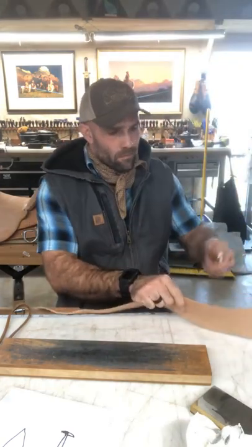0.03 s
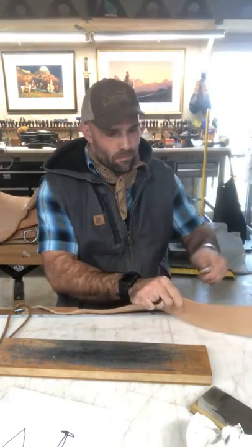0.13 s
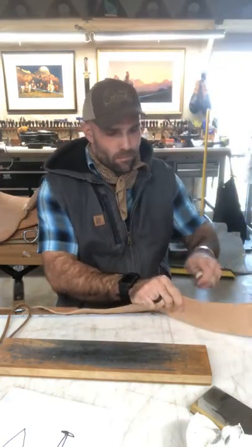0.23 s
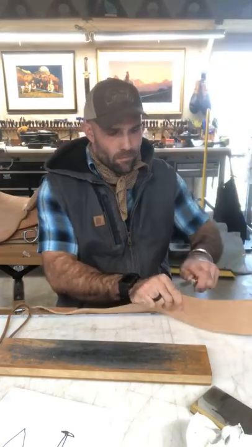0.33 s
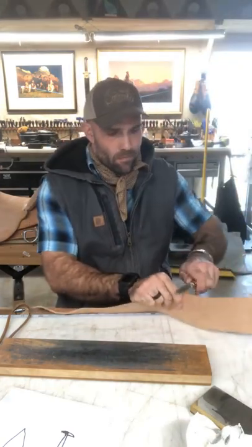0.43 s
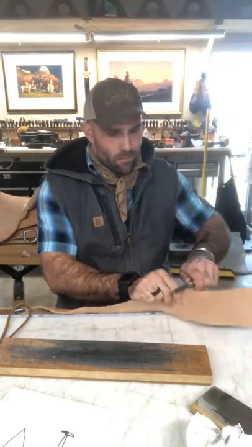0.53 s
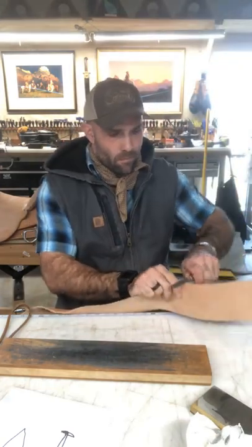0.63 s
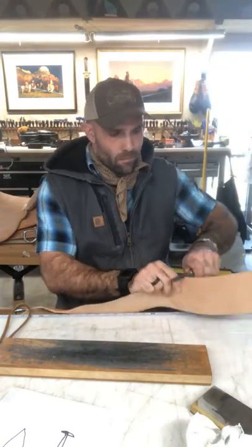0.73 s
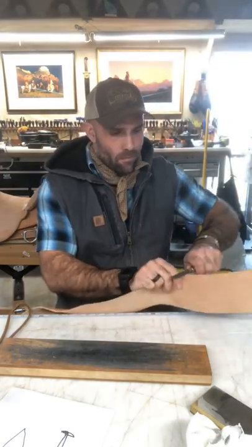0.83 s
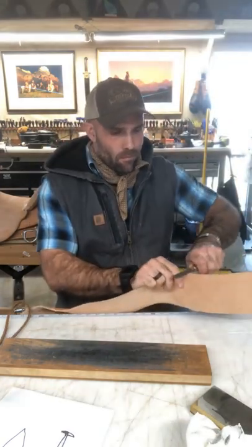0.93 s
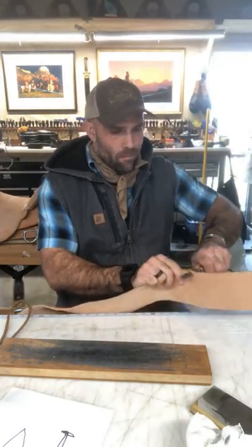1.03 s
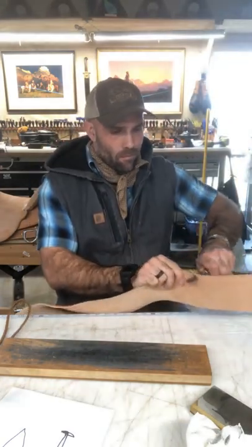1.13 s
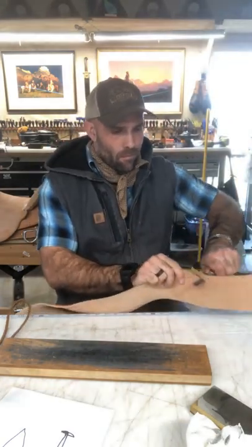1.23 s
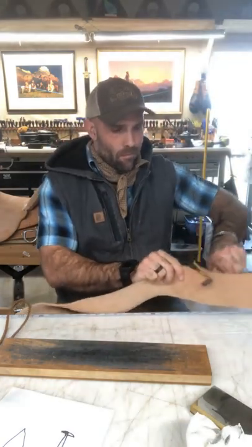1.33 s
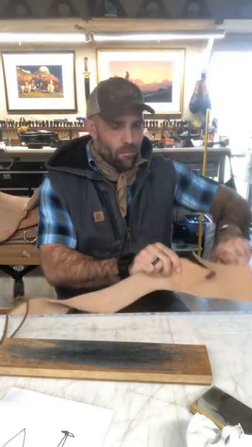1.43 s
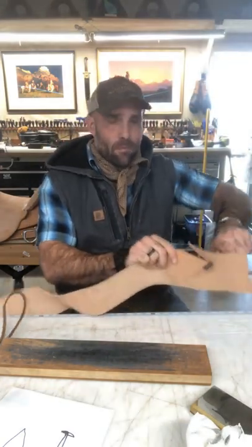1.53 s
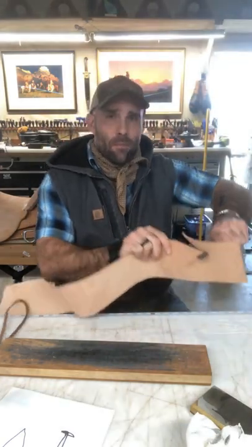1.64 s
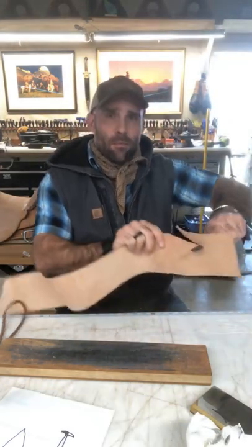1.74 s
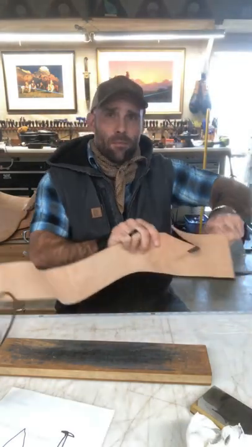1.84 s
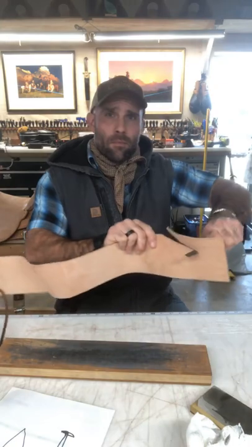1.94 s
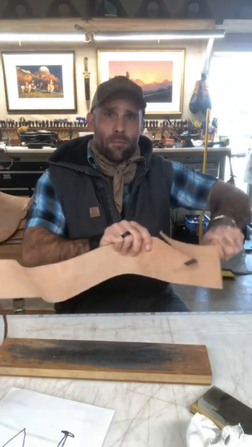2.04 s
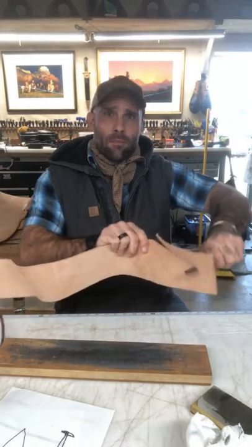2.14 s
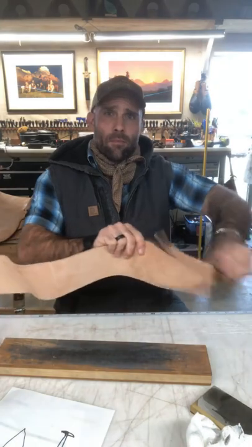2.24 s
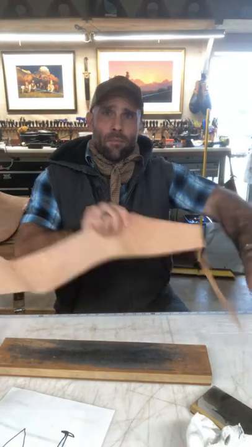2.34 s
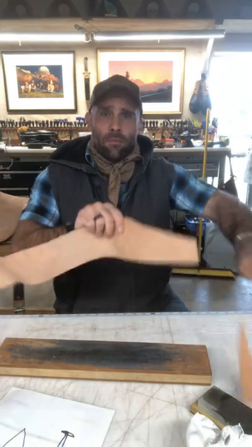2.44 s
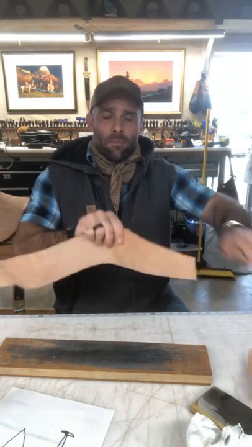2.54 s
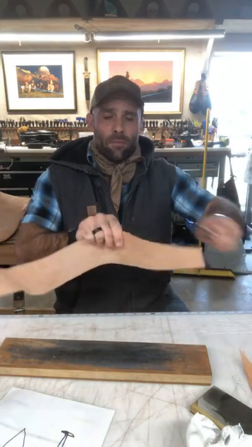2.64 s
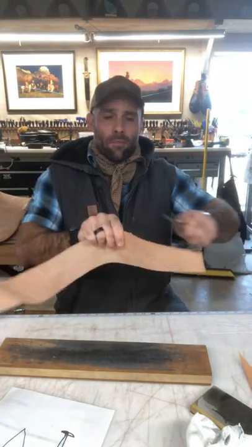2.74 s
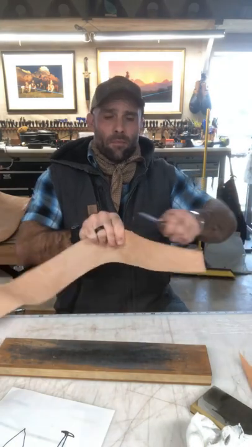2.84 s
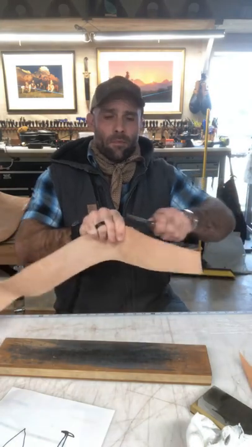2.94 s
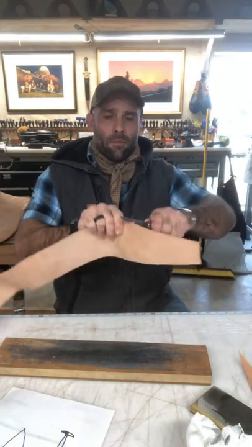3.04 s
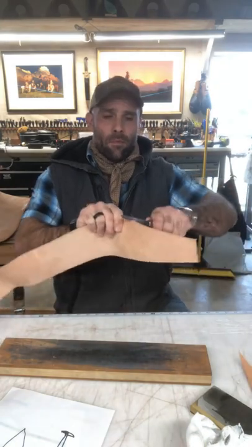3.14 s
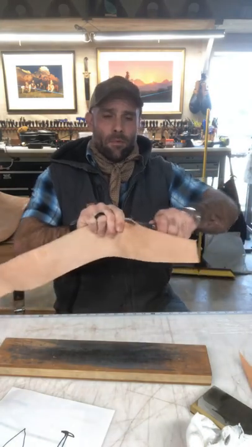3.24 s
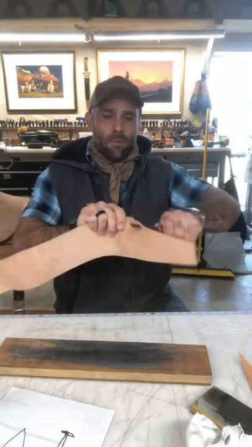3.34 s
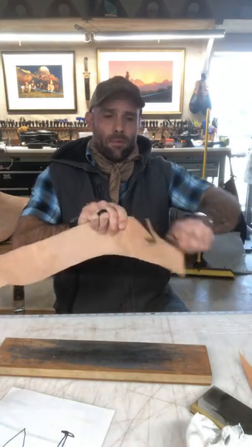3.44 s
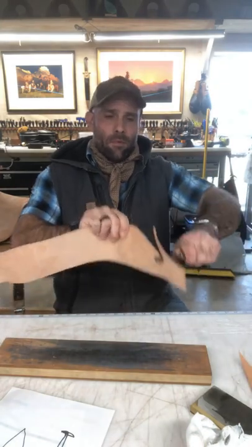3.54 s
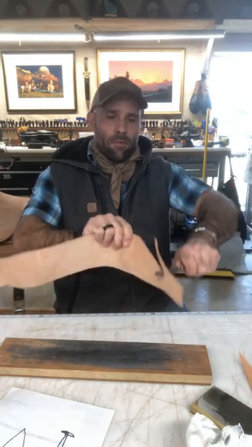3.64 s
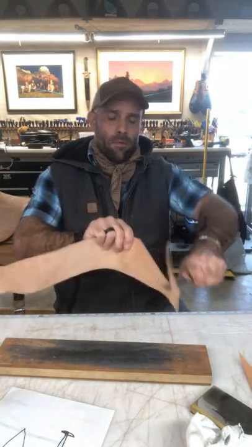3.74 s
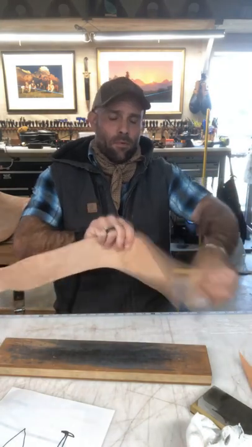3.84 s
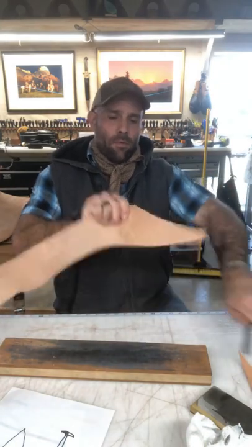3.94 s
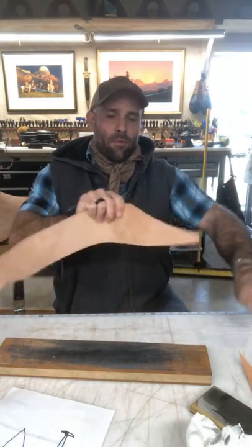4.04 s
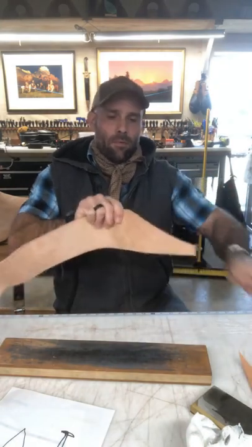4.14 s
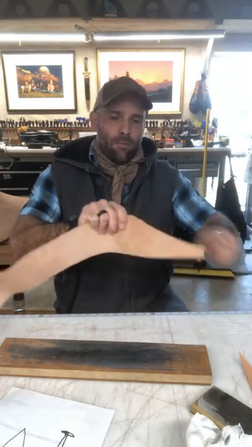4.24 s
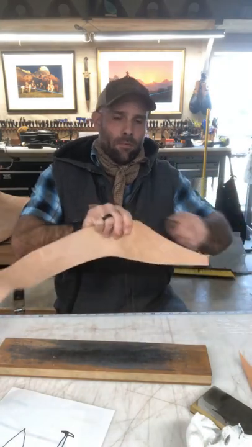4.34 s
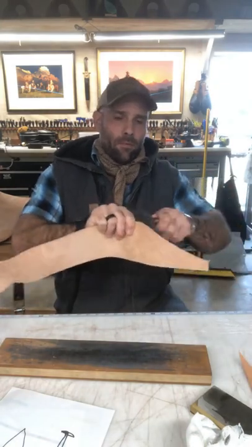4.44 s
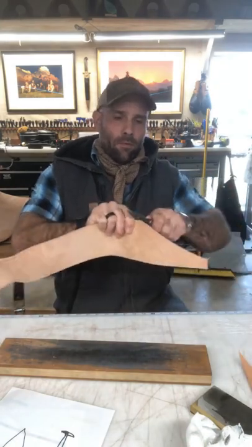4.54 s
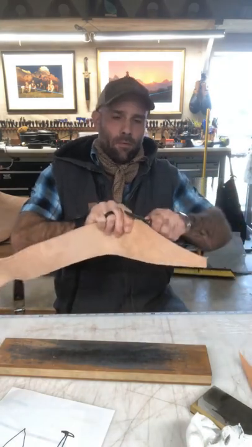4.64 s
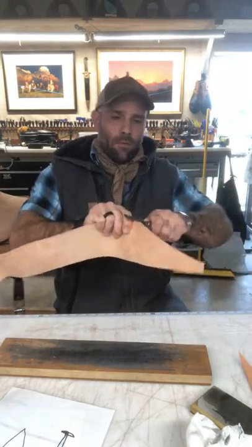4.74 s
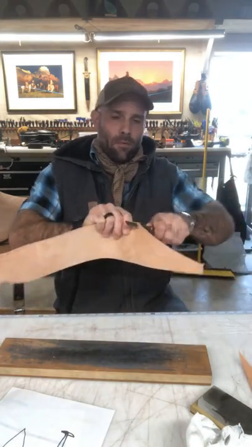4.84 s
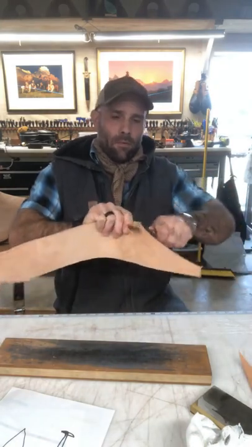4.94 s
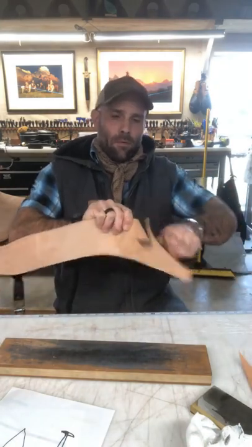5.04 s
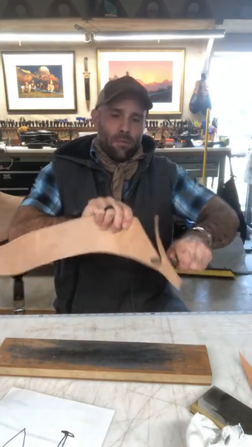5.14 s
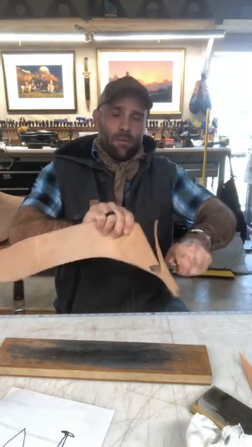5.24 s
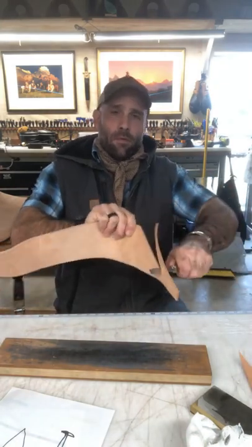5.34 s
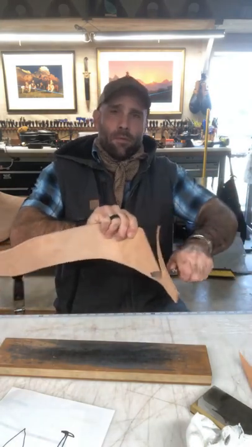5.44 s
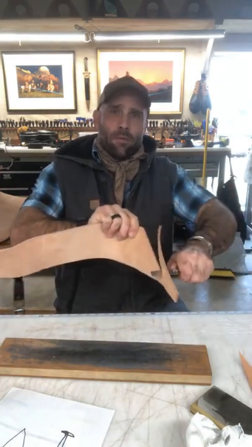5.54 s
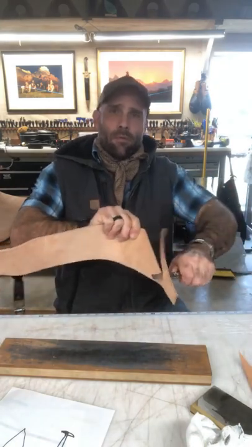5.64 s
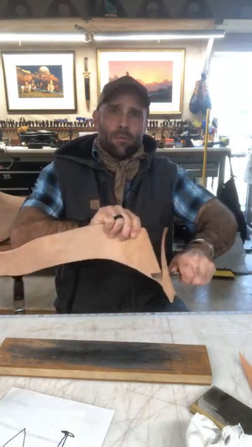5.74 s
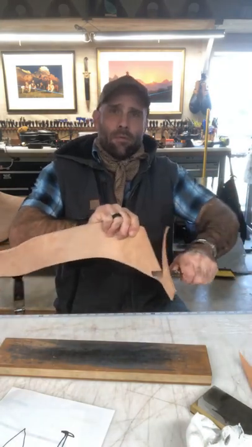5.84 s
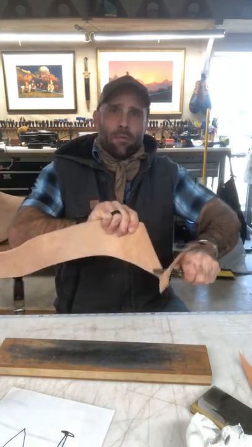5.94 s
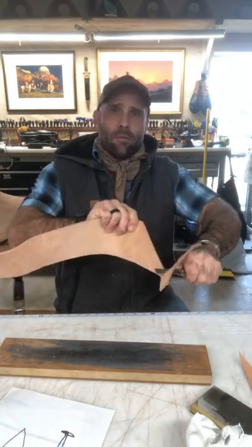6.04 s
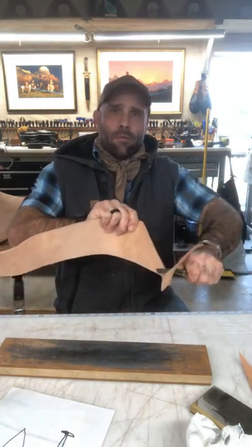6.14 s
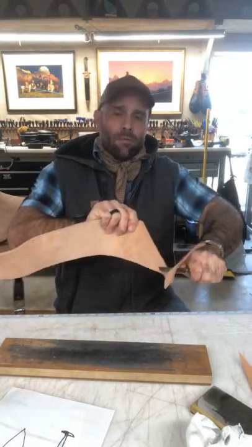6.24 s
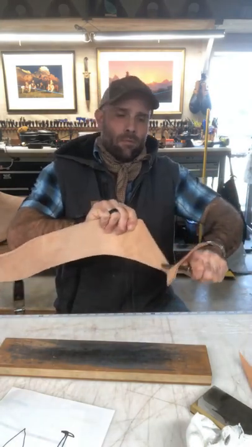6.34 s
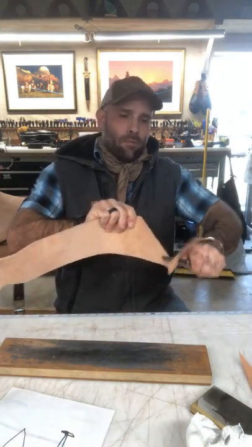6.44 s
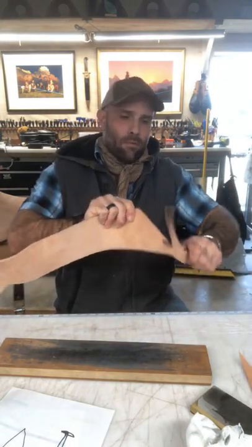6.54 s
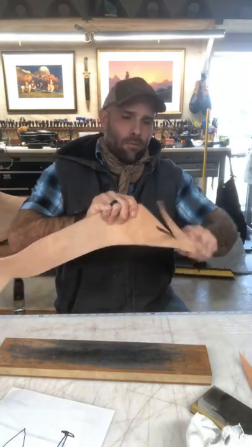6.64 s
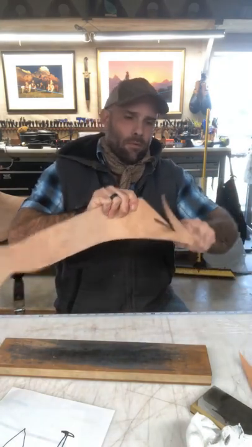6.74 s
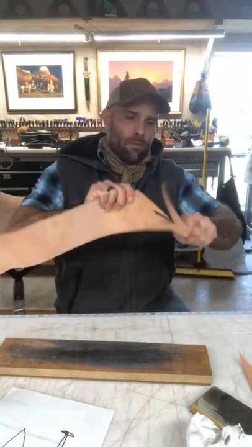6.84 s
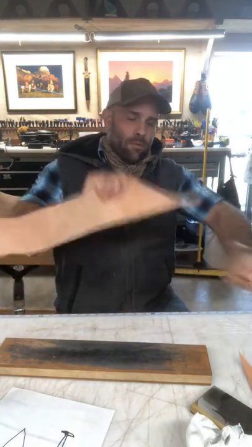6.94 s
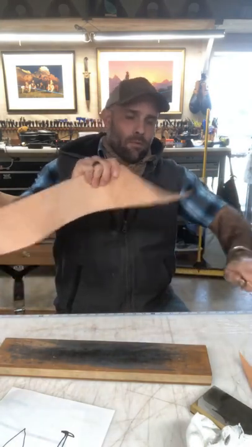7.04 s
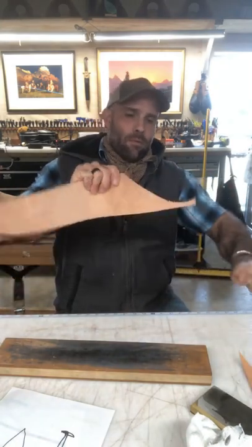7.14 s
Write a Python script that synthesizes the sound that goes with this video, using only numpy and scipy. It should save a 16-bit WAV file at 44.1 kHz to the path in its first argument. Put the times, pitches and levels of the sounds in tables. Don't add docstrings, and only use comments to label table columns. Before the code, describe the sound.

Low hum and faint air in a workshop, heard by a nearby phone with slightly dulled top. A blade drags through stiff leather with a dry scrape and a moving mid-pitched resonance: first a long stroke, then two brief strong ones with muffled thuds and little ticks between. A cluster of sharp, irregular stick-slip snaps follows, then near quiet, a loud short rip and a final dull drop.

```python
import sys
import numpy as np
from scipy import signal
from scipy.fft import rfft, irfft, next_fast_len
from scipy.io import wavfile
from scipy.ndimage import uniform_filter1d, map_coordinates

SR = 44100
rng = np.random.default_rng(int(sys.argv[2]) if len(sys.argv) > 2 else 0)


def unload_audio(sound):
    columns = np.transpose(np.atleast_2d(sound))
    steps = np.round(np.clip(columns, -1, 1) * 32767)
    wavfile.write(sys.argv[1], SR, steps.astype(np.int16))


def level_to_linear(level):
    exponent = np.asarray(level, float) / 20
    return 10 ** exponent


N = 317501

# (frequency [Hz], width [Hz], level [dB])
BLADE_MODES = [(1550, 75, 4.5), (2990, 39, -0.5), (3866, 28, -4), (4726, 40, -1), (5320, 47, -0.5),
               (6170, 480, -8.5), (6850, 51, -18), (9300, 260, -2.5)]
# (frequency [Hz], t60 [s])
SHOP_T60 = [(150, 0.42), (600, 0.28), (2000, 0.35), (9000, 0.34)]


def unit(x):
    return x / np.sqrt(np.mean(np.abs(x) ** 2) + 1e-20)


def along(points, hz):
    f, v = np.transpose(points)
    return np.interp(np.log(hz + 1), np.log(f + 1), v)


def filtered(x, response):
    m = next_fast_len(N + SR // 2)
    return irfft(rfft(x, m) * response(np.fft.rfftfreq(m, 1 / SR)), m)[:N]


def peak(f, hz, width_hz):
    return 1j * f * width_hz / (hz * hz - f * f + 1j * f * width_hz)


def body(modes):
    return lambda f: sum((-1) ** k * level_to_linear(db) * peak(f, c, w) for k, (c, w, db) in enumerate(modes))


def wobble(rate):
    knots = rng.standard_normal(int(N * rate / SR) + 4)
    return map_coordinates(knots, [np.arange(N) * rate / SR])


def impulses(times, levels_db):
    return np.bincount([round(s * SR) for s in times], level_to_linear(levels_db), N)


def bursts(rows, rise):
    out, t = np.zeros(N + SR), np.arange(SR // 20) / SR
    for s, db, length in rows:
        out[round(s * SR):][:len(t)] += level_to_linear(db) * (1 - np.exp(-t / rise)) * np.exp(-(t / length) ** 2)
    return out[:N]


def swells(rows):
    t = np.arange(N) / SR
    return sum(level_to_linear(db) * np.exp(-((t - s) / half) ** 2) for s, db, half in rows)


def fibres(rough_db, rate, streak_db=3):
    z = signal.stft(rng.standard_normal(N), nperseg=1024)[2]
    field = uniform_filter1d(rng.standard_normal(z.shape), size=3, axis=0)
    field = uniform_filter1d(field, size=14, axis=1)
    x = signal.istft(z * level_to_linear(streak_db * unit(field)), nperseg=1024)[1][:N]
    return unit(level_to_linear(rough_db * wobble(rate)) * x)


def hiss(rough_db, rate):
    # (frequency [Hz], level [dB per Hz])
    edge_colour = [(300, -22.5), (1200, 8.5), (2500, 6.5), (4000, 6), (5200, 3.5), (7000, 0.5), (9100, 1),
                   (10400, -13)]
    return unit(filtered(fibres(rough_db, rate), lambda f: level_to_linear(along(edge_colour, f))))


def singing(hz, width_hz):
    f, when, z = signal.stft(fibres(2, 300, streak_db=2.5), SR, nperseg=512)
    centre, width = (np.interp(when * SR, np.arange(N), c) for c in (hz, width_hz))
    gain = np.abs(peak(f[:, None], centre, width)) ** 2
    gain = gain / np.sqrt(np.mean(gain ** 2, axis=0))
    return unit(signal.istft(z * gain, SR, nperseg=512)[1][:N])


def knife_moves():
    # (time [s], push [dB], song [Hz])
    bite = [(0.94, -76, 1480), (0.995, -67.5, 1590), (1.002, -55, 1550), (1.014, -51, 1550),
            (1.054, -50, 1540), (1.12, -59, 1510), (1.138, -54.5, 1530)]
    # (time [s], push [dB], song [Hz])
    first = [(1.138, -58, 1490), (1.3, -52.5, 1550), (1.427, -53.5, 1500), (1.689, -67, 1440),
             (1.831, -59, 1550), (1.927, -64.5, 1500), (2.103, -54.5, 1520), (2.213, -54, 1640)]
    # (time [s], push [dB], song [Hz])
    first_out = [(2.214, -51.5, 1650), (2.28, -44.5, 1550), (2.309, -38, 1420), (2.322, -41, 1340),
                 (2.332, -50.5, 1400), (2.36, -53, 1430)]
    # (time [s], push [dB], song [Hz])
    probe = [(3.13, -92, 1710), (3.162, -57.5, 1680), (3.197, -61, 1510), (3.213, -90.5, 1620)]
    # (time [s], push [dB], song [Hz])
    second = [(3.227, -71, 1710), (3.231, -51.5, 1680), (3.25, -52, 1700), (3.273, -44.5, 1770),
              (3.3, -49.5, 1800), (3.335, -51, 1900), (3.39, -46, 2050), (3.425, -40.5, 2050),
              (3.46, -42, 1900)]
    # (time [s], push [dB], song [Hz])
    slack = [(3.459, -41, 1770), (3.501, -43, 1670), (3.531, -45, 1430), (3.57, -76, 1480)]
    # (time [s], push [dB], song [Hz])
    nudge = [(3.59, -56.5, 1550), (3.596, -44, 1470), (3.619, -49.5, 1500), (3.642, -58, 1600)]
    # (time [s], push [dB], song [Hz])
    second_out = [(3.702, -61, 1730), (3.705, -49.5, 1700), (3.748, -41.5, 1600), (3.804, -39.5, 1580),
                  (3.84, -40, 1800), (3.866, -39, 1850), (3.883, -39, 1650), (3.89, -50, 1640),
                  (3.915, -49.5, 1610)]
    # (time [s], push [dB], song [Hz])
    third = [(4.797, -59, 1830), (4.807, -45.5, 1800), (4.822, -45.5, 1760), (4.832, -50.5, 1800),
             (4.905, -58.5, 1850), (4.95, -53, 1870), (4.99, -48.5, 1880), (5.04, -49.5, 1850),
             (5.091, -41.5, 1900)]
    # (time [s], push [dB], song [Hz])
    third_out = [(5.091, -44.5, 1780), (5.143, -38.5, 1550), (5.176, -38, 1490), (5.2, -47.5, 1480),
                 (5.22, -64.5, 1480)]
    # (time [s], push [dB], song [Hz])
    last = [(6.848, -67, 1450), (6.898, -50, 1210), (6.912, -41.5, 1270), (6.923, -32.5, 1270),
            (6.934, -32.5, 1350), (6.948, -29, 1380), (6.957, -29.5, 1150), (6.962, -38, 1050)]
    # (song width [Hz], deep flap [dB], high flap [dB])
    free = [(650, 1, 0), (660, -1, -4), (800, -2.5, 3.5), (500, 1, 2), (720, -1, -5), (800, -0.5, -0.5),
            (700, -2, -4), (800, 0.5, 3.5), (400, 3.5, 0), (600, 4, 1.5), (706, 1, 6)]
    # (song [dB], flap [dB], upper song [dB], upper song at start [Hz], at end [Hz])
    hang = [(4.5, 6, 2, 3300, 3500), (1, 6, -4.5, 3100, 1900), (0.5, 4, 3.5, 2080, 2420),
            (9, -2, 10.5, 2880, 2900), (7, -1, -5, 3400, 2000), (1, 5, 5.5, 2250, 2940),
            (-1, 8.5, 7, 2250, 3440), (3.5, 5.5, -2, 2900, 2100), (5, -3.5, 6, 1330, 1460),
            (0.5, -1, 6.5, 2280, 2900), (6.5, -2, -3, 4600, 8200)]
    # (time [s], rise [s], fall [s], peak [dB], flap [dB])
    grazes = [
        (0.0, 0.0093, 0.13, -64, 6.5),
        (2.915, 0.0028, 0.026, -62.5, 8),
        (5.968, 0.0032, 0.041, -55, 3.5),
        (6.02, 0.032, 0.023, -52, 2.5),
        (6.386, 0.0036, 0.076, -71, -20),
        (6.516, 0.22, .125, -67.5, -4),
    ]
    # (song width [Hz], deep flap [dB], high flap [dB])
    graze_free = (580, 0, 0)
    song_hz, song_db = 1420, -5
    upper_song = (-0.5, 2000, 3300)  # dB, Hz at start, Hz at end
    paths = (bite, first, first_out, probe, second, slack, nudge, second_out, third, third_out, last)
    cuts = list(zip(paths, np.hstack([free, hang])))
    for s, rise, fall, db, flap_db in grazes:
        path = [(s, db - 7.5, song_hz), (s + rise, db, song_hz), (s + rise + fall, db - 9.5, song_hz)]
        cuts.append((path, (*graze_free, song_db, flap_db, *upper_song)))
    return sorted(cuts, key=lambda cut: cut[0][0][0])


def strokes():
    # (frequency [Hz], width [Hz], level [dB])
    flap_modes = [(235, 95, -0.5), (340, 125, 2), (597, 135, 1), (1012, 140, -1.5)]
    cuts = knife_moves()
    t = np.arange(N) / SR
    s, *push = np.concatenate([path for path, hang in cuts]).T
    edge_db, song_hz = (np.interp(t, s, c) for c in push)
    ends = np.ravel([(path[0][0], path[-1][0]) for path, hang in cuts])
    held = np.array([(*hang[:-2], hz) for path, hang in cuts for hz in hang[-2:]]).T
    free_hz, deep_db, high_db, song_db, flap_db, upper_db, upper_hz = (np.interp(t, ends, c) for c in held)

    extra_db = edge_db + 50
    song_db = song_db - 0.22 * extra_db
    flap_db = flap_db - 0.11 * extra_db
    touching = sum((t >= a) & (t < b) for a, b in ends.reshape(-1, 2)) > 0
    drive = uniform_filter1d(touching * 1., size=100) * level_to_linear(edge_db + 0.47 * wobble(40))

    width_hz = np.clip(free_hz + 10 * extra_db, 200, 1200)
    songs = level_to_linear(song_db) * singing(song_hz, width_hz)
    songs = songs + level_to_linear(upper_db - 5.0) * singing(upper_hz, 0.56 * width_hz)

    shake = fibres(2.4, 120, streak_db=1.5)
    bands = (flap_modes[:2], flap_modes[2:-1], flap_modes[-1:])
    deep, middle, high = (filtered(shake, body(modes)) for modes in bands)
    flap = unit(level_to_linear(deep_db) * deep + middle - level_to_linear(high_db) * high)
    blade = unit(filtered(fibres(5.8, 150), body(BLADE_MODES)))
    edge = hiss(0.65, 500)
    glare = filtered(edge, lambda f: peak(f, 7700, 3300))
    edge = edge + level_to_linear(0.34 * (edge_db + 25.5)) * glare
    return drive * (edge + songs + level_to_linear(flap_db) * flap + level_to_linear(-5.0) * blade)


def jerks():
    # (time [s], peak [dB], hiss [dB], flap [dB], length [s])
    slips = [(5.2636, -25.5, -22, -5, 0.007), (5.267, -32, -14.5, -5, 0.0034),
             (5.395, -46.5, -7, -18, 0.0036), (5.421, -32.5, -14, -7, 0.0034),
             (5.4232, -33, -17, 1, 0.0034), (5.4598, -41.5, -3, -10, 0.002),
             (5.4607, -33.5, 0.5, 7, 0.0032), (5.4646, -28, -9, 5, 0.004), (5.4845, -21, -8, 5, 0.003),
             (5.4885, -23, -13, -5, 0.008), (5.654, -36, -17, -16, 0.0076),
             (5.663, -23.5, -13, 2.5, 0.0052), (5.681, -37, -12, -6, 0.007),
             (5.6855, -21, -12.5, 0, 0.0075), (5.7062, -21, -14, -5.5, 0.0045),
             (5.7106, -23.5, -10, -8, 0.004), (5.7145, -17.5, -12, -1.5, 0.0083),
             (5.7217, -21.5, -10, -2, 0.0056), (5.727, -34, -11, 1, 0.004), (5.8583, -46, -14, -14, 0.004),
             (5.8757, -22, -18, 2, 0.0069), (5.921, -23, -11, 5.5, 0.003), (5.923, -21.5, -4, 0, 0.0048),
             (5.9334, -11, -16, -5, 0.0035), (5.9385, -27, -11, -7, 0.0027),
             (5.9485, -11.5, -18, -7.5, 0.0053), (5.955, -23.5, -5.5, 4, 0.005),
             (5.9617, -22.5, -16.5, 6, 0.0047), (6.05, -32.5, -15, 3, 0.0023), (6.056, -33, -13, -8, 0.003),
             (6.059, -31.5, -9, -11, 0.003)]
    # (frequency [Hz], width [Hz], level [dB])
    taut_modes = [(1470, 100, 2), (2520, 400, -12), (1310, 110, -9.5)]
    # (frequency [Hz], width [Hz], level [dB])
    tugged_modes = [(229, 81, -2.5), (316, 64, 3.5), (594, 73, -1), (940, 150, -5.5)]
    s, db, hiss_db, flap_db, length = np.transpose(slips)

    def tearing(level_db):
        return bursts(zip(s, level_db, length), 0.00028)

    snaps = impulses(s + 0.00103, db + 26)
    ring = filtered(snaps + tearing(db + 2.3) * fibres(0.7, 740), body(taut_modes))
    tugs = impulses(s + 0.001, db + flap_db + 23.5)
    shaking = tearing(db + flap_db + 3.5) * rng.standard_normal(N)
    flap = filtered(tugs + shaking, body(tugged_modes))
    bright = tearing(db + hiss_db - 1.5) * hiss(1.2, 800)
    return ring + flap + bright + level_to_linear(-16) * filtered(bright, body(BLADE_MODES))


def rip():
    # (time [s], peak [dB], ring [Hz], t60 [s])
    snap_rows = [
        (6.926, -24, 1240, 0.03),
        (6.931, -22, 1250, 0.016),
        (6.9385, -13, 1580, 0.029),
        (6.9435, -14, 1550, 0.018),
        (6.9477, -10.5, 1280, 0.025),
        (6.9484, -8.5, 1294, 0.018),
        (6.958, -1, 1150, 0.0095),
        (6.9605, -8, 590, 0.012),
    ]
    out, t = np.zeros(N + SR), np.arange(SR // 20) / SR
    for s, db, hz, t60 in snap_rows:
        decay = level_to_linear(db - 2.5 - 60 * t / t60)
        out[round(s * SR):][:len(t)] += decay * np.sin(2 * np.pi * hz * t) * (1 - np.exp(-t / 0.00043))
    return out[:N]


def creaks():
    # (time [s], peak [dB])
    tug_rows = [(2.922, -37.5), (2.926, -39), (2.933, -49), (3.091, -40), (6.18, -54), (6.192, -41.5),
                (6.243, -48), (6.274, -48), (6.357, -42.5), (6.735, -45)]
    s, db = np.transpose(tug_rows)

    def dull_end(f):
        return (peak(f, 1600, 450) - .5 * peak(f, 800, 900)) / (1 + 1j * f / 2200) ** 2

    return filtered(impulses(s, db + 26.0), dull_end)


def thuds():
    # (time [s], peak [dB], pitch [Hz], slap [dB])
    falls = [(0.021, -41, 310, -1), (0.123, -35, 230, -13), (0.565, -41, 214, -24), (2.319, -30, 340, 7.5),
             (2.525, -36.5, 304, 2), (2.532, -31, 146, -4), (2.575, -29, 140, -5.5), (2.608, -33.5, 120, 0),
             (2.768, -33, 334, 1.5), (2.785, -36, 305, -7), (2.94, -31.5, 161, -32),
             (3.089, -36, 198, -8.5), (3.88, -31, 310, -1), (4.126, -32.5, 497, 0.5),
             (4.141, -28.5, 151, -11), (4.167, -32.5, 140, -17), (4.183, -42.5, 179, 4),
             (4.306, -38, 194, -5), (6.728, -48.5, 124, -5), (6.958, -24.5, 404, 14.5),
             (7.126, -28.5, 189, -38)]
    # (frequency [Hz], width [Hz], level [dB])
    bench_modes = [(83, 2.5, 14), (140, 74, -36), (239, 53, 6.5), (294, 138, -2), (484, 36, -6),
                   (750, 200, -19)]
    out, settle, blows = np.zeros(N + SR), np.zeros(N + SR), np.zeros(N)
    t = np.arange(SR // 6) / SR
    for s, db, hz, slap_db in falls:
        start = round(s * SR)
        low_push = level_to_linear(db - 60 * t / 0.06) * np.sin(2 * np.pi * hz * t)
        out[start:][:len(t)] += low_push * (1 - np.exp(-t / 0.0015))
        settle[start:][:len(t)] += level_to_linear(db + 0.5 - 60 * t / 0.11) * (1 - np.exp(-t / 0.0013))
        blows[start] = level_to_linear(db + 33.5)
    slap = bursts([(s, db + slap_db + 12.0, .006) for s, db, hz, slap_db in falls], 0.0008)
    slap = slap * rng.standard_normal(N)
    s, db, hz, slap_db = np.transpose(falls)
    slap += impulses(s, db + slap_db + 3)
    rumble = filtered(settle[:N] * rng.standard_normal(N), lambda f: peak(f, 250, 520) ** 2)
    hum = filtered(blows, body(bench_modes))
    knock = out[:N] + rumble + hum + filtered(slap, lambda f: peak(f, 900, 770))
    return filtered(knock, lambda f: (1 + 1j * f / 1500) ** -3.)


def ticks():
    # (time [s], peak [dB], centre [Hz], length [s])
    tick_rows = [(2.323, -37.5, 3000, 0.0026), (2.525, -44, 4630, 0.0025), (2.5701, -25.5, 5560, 0.00063),
                 (2.5716, -30, 3400, 0.0021), (2.575, -43, 8970, 0.0017), (2.585, -39.5, 3700, 0.0026),
                 (2.608, -47, 3000, 0.0024), (2.93, -51.5, 3000, 0.003), (3.879, -39, 4500, 0.0018),
                 (6.949, -23, 2300, 0.0027), (6.9581, -16.5, 2190, 0.0013)]
    out, t = np.zeros(N + SR), np.arange(SR // 50) / SR
    f = np.fft.rfftfreq(len(t), 1 / SR)
    for s, db, hz, length in tick_rows:
        crack = (t == 0) + .25 * rng.standard_normal(len(t)) * np.exp(-(t / length) ** 2)
        out[round(s * SR):][:len(t)] += level_to_linear(db + 19.0) * irfft(rfft(crack) * peak(f, hz, 5300), len(t))
    return out[:N]


def scuffs():
    # (time [s], peak [dB], centre [Hz], length [s])
    rubs = [(2.813, -53, 5860, .008), (4.092, -46.5, 3000, 0.011), (4.108, -44, 2600, 0.011),
            (4.11, -49, 7540, 0.0091), (4.1252, -36.5, 6500, 0.0032), (4.128, -45.5, 9200, .005),
            (4.132, -38, 3300, .004), (4.1385, -38, 6800, 0.0064), (4.1832, -42, 4500, 0.004),
            (4.184, -48, 9000, .004), (4.2075, -46, 6800, 0.0038), (4.224, -48, 7500, 0.0056)]
    out, t = np.zeros(N + SR), np.arange(SR // 25) / SR
    f = np.fft.rfftfreq(len(t), 1 / SR)
    for s, db, hz, length in rubs:
        rub = rng.standard_normal(len(t)) * (1 - np.exp(-t / 0.00035)) * np.exp(-(t / length) ** 2)
        thin = irfft(rfft(rub) * peak(f, hz, 1.2 * hz) ** 2, len(t))
        out[round(s * SR):][:len(t)] += level_to_linear(db - 5.5) * thin
    return out[:N]


def pings():
    # (time [s], peak [dB], length [s])
    touches = [
        (0.674, -54, 0.035),
        (6.384, -53, 0.018),
    ]
    brush = bursts([(s + 0.0027, db + 5.5, length) for s, db, length in touches], 0.00091)
    brush = brush * rng.standard_normal(N)

    def steel(f):
        return body(BLADE_MODES)(f) * (f < 7500) + 2.5 * peak(f, 6380, 130)

    return filtered(brush, steel) + level_to_linear(-13) * brush


def rustle():
    # (time [s], level [dB], half length [s])
    shifts = [
        (6.547, -75, .05),
        (6.653, -64, 0.04),
        (6.716, -67, 0.023),
    ]
    level = swells([(s, db, half / 2) for s, db, half in shifts]) * level_to_linear(3 * wobble(200))
    return level * unit(filtered(rng.standard_normal(N), lambda f: peak(f, 9500, 2500) ** 2))


def tone(shape, lo_hz, hi_hz):
    def colour(f):
        return level_to_linear(along(shape, f)) * (f > lo_hz) * (f <= hi_hz)

    return unit(filtered(rng.standard_normal(N), colour))


def air():
    # (frequency [Hz], level [dB per Hz])
    deep_colour = [(22, -20), (31, -14), (40, 2), (59, 0), (75, -1), (102, -19)]
    # (frequency [Hz], level [dB per Hz])
    upper_colour = [(102, -3.5), (113, -32), (135, -9.5), (161, -22.5), (178, -16), (230, -27)]
    # (frequency [Hz], level [dB per Hz])
    air_colour = [(140, -40.5), (230, -4.5), (659, -17.5), (1390, -20.5), (1830, -23), (8060, -28.5),
                  (10400, -33), (13500, -82)]
    # (time [s], level [dB])
    hum_curve = [(0.0, -53), (0.5, -52), (1.12, -49.5), (1.3, -51), (2.11, -48.5), (2.67, -48), (3.51, -51),
                 (3.85, -50), (5.0, -51), (5.29, -52), (5.85, -50.5), (6.38, -53), (7.1, -47), (7.2, -56)]
    # (time [s], level [dB], half length [s])
    sways = [
        (0.0, -54.5, 0.37),
        (1.62, -54.5, 0.44),
        (2.7, -53, 0.37),
        (3.5, -57.5, 0.93),
        (5.85, -58, 0.78),
        (7.17, -43, 0.08),
    ]
    # (time [s], level [dB], rise [s], hold [s], level at end of hold [dB], fade [dB per s])
    far_whistle = (4.03, -71, .08, .4, -74, 70)
    t = np.arange(N) / SR
    strength = level_to_linear(np.interp(t, *np.transpose(hum_curve)))
    upper = np.maximum(strength * level_to_linear(-11), swells(sways))
    hum = strength * tone(deep_colour, 0, 89) + upper * tone(upper_colour, 100, 230)
    s, db, rise, hold, end_db, fade_db = far_whistle
    times = [s - rise, s, s + hold, s + hold + 1]
    level_db = np.interp(t, times, [db - 10, db, end_db, end_db - fade_db], -120, -120)
    thin = unit(filtered(rng.standard_normal(N), lambda f: peak(f, 2160, 400) ** 2))
    whistle = level_to_linear(level_db + 3.4 * wobble(30)) * thin
    return hum + level_to_linear(-66.5) * tone(air_colour, 160, 11000) + whistle


def walls(x):
    hz, t, z = signal.stft(rng.standard_normal(SR * 3 // 5), SR, nperseg=256)
    tail = signal.istft(z * level_to_linear(-60 * t / along(SHOP_T60, hz)[:, None]), SR, nperseg=256)[1]
    return signal.fftconvolve(np.pad(x, (300, 0)), tail / np.linalg.norm(tail))[:N]


def shop(x):
    hz, t, z = signal.stft(np.pad(x, (350, 0))[:N], SR, nperseg=512, noverlap=384)
    keep = level_to_linear(-120 * (t[1] - t[0]) / along(SHOP_T60, hz))
    power = uniform_filter1d(np.abs(z) ** 2, size=4, axis=0)
    linger = np.array([signal.lfilter([1 - k], [1, -k], p) for k, p in zip(keep, power)])
    fresh = unit(signal.stft(rng.standard_normal(N), SR, nperseg=512, noverlap=384)[2])
    return signal.istft(np.sqrt(np.abs(linger)) * fresh, SR, nperseg=512, noverlap=384)[1][:N]


def scene():
    cut = level_to_linear(-0.5) * strokes()
    hits = jerks() + creaks() + rip() + thuds() + ticks() + scuffs() + pings() + rustle()
    return (cut + hits + level_to_linear(-7.0) * walls(cut) + level_to_linear(-8.5) * shop(hits) + air())[None]


def low_pass(x):
    return signal.sosfilt(signal.butter(12, 10610, fs=SR, output="sos"), x)


def record(dry):
    x = filtered(dry[0], lambda f: 1 / (1 + (f / 9700) ** 24) * (f < 10350))
    mix = x + level_to_linear(-100) * rng.standard_normal(N)
    return low_pass(mix[None])


dry = scene()
out = record(dry)
unload_audio(out)
```